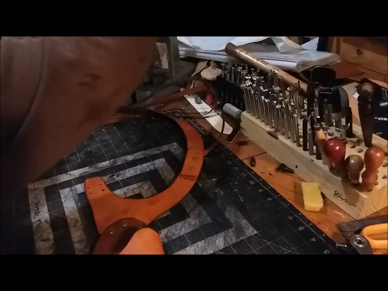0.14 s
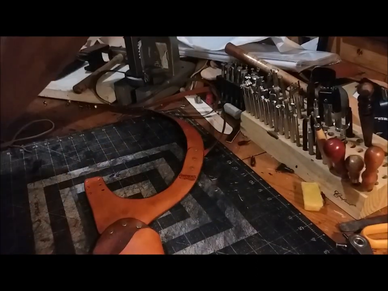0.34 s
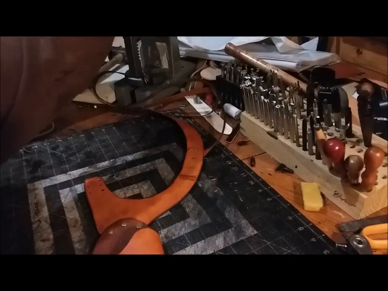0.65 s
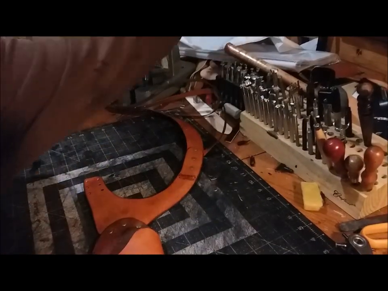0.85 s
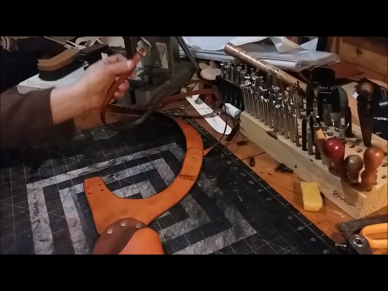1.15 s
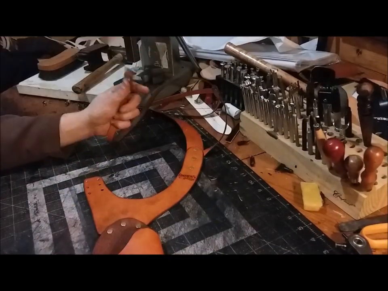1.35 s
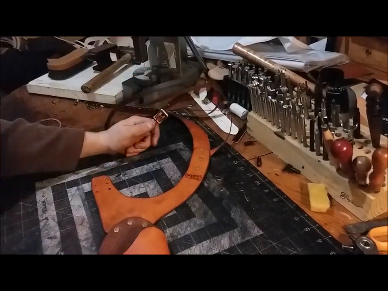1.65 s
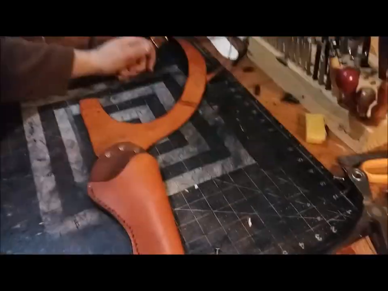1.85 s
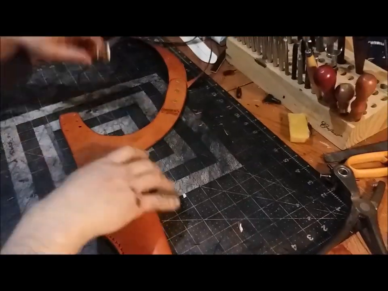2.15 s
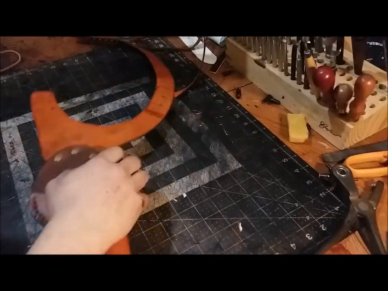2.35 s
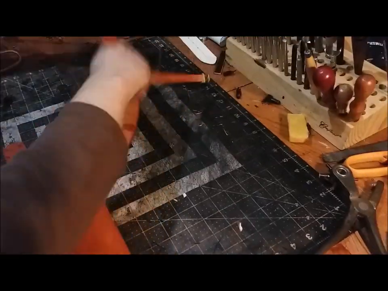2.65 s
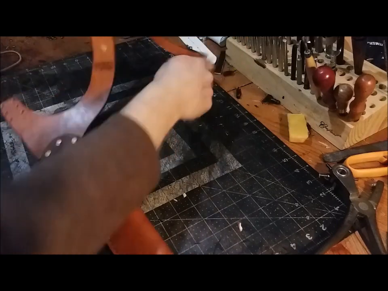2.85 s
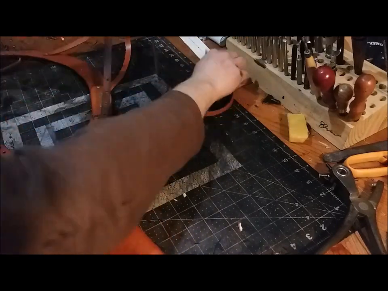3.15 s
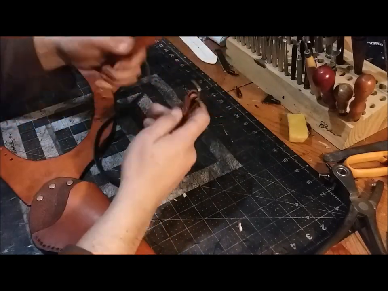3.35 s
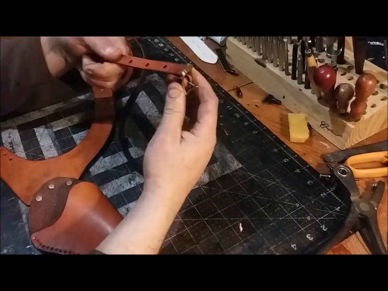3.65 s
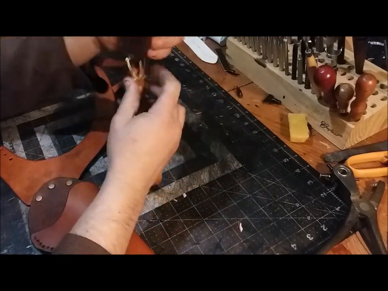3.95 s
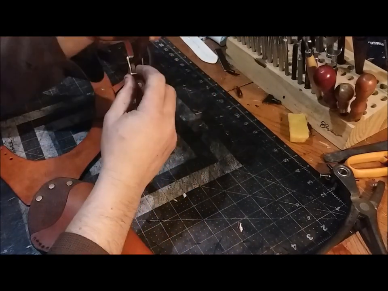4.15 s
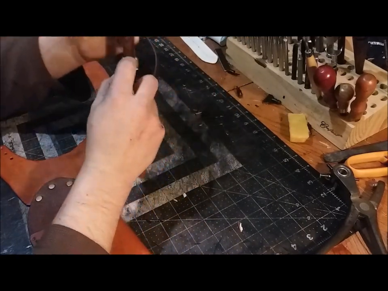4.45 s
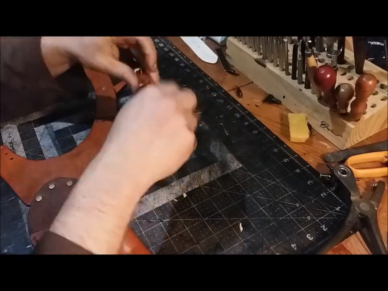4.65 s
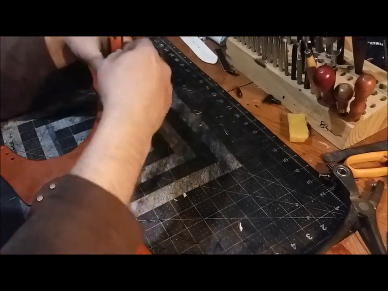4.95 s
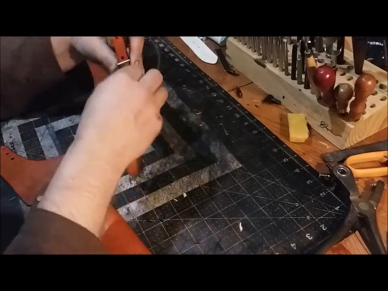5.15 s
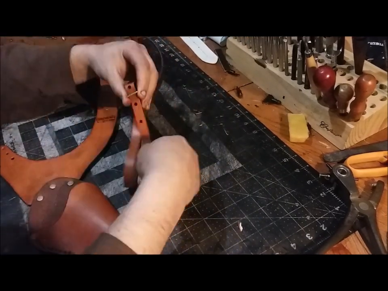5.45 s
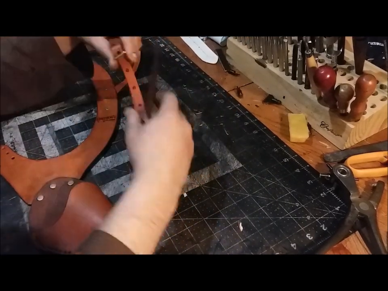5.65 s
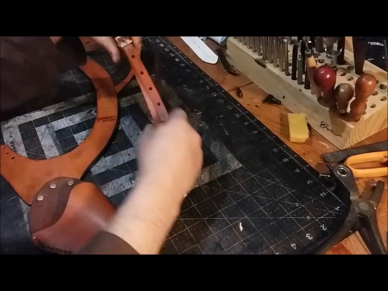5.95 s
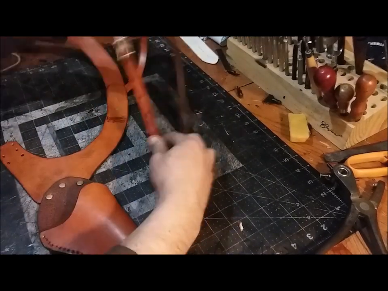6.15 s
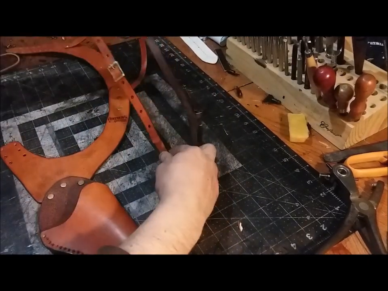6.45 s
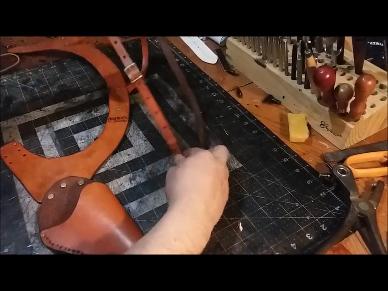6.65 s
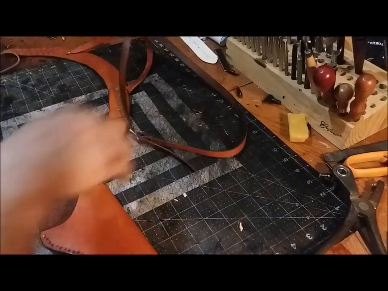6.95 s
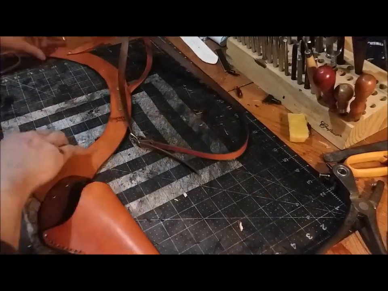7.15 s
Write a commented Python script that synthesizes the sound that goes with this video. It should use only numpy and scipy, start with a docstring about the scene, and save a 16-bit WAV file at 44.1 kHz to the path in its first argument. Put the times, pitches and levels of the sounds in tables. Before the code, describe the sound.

Leather straps rasp, slap and slide on a workbench while a small metal buckle clicks and clinks over a faint hum.

```python
"""A cluttered workbench, up close: leather straps with a small metal buckle are handled.
A strap is dragged out with a dry rasp, slaps down, slides over the cutting mat and is pulled through
the buckle, which clicks and drops. Tiny friction slips ring leather and bench; the buckle's tongue
and frame ring in damped modes. Hands bump the bench; the shop answers briefly, over a faint hum."""
import sys
import numpy as np
from scipy import signal
from scipy.fft import rfft, irfft, next_fast_len
from scipy.io import wavfile
from scipy.ndimage import uniform_filter1d, map_coordinates

SR = 44100
rng = np.random.default_rng(int(sys.argv[2]) if len(sys.argv) > 2 else 0)


def persist_wave(psi):
    """Save psi, clipped to +-1, as 16-bit WAV."""
    counts = np.round(np.clip(psi, -1, 1) * 32767).astype(np.int16)
    wavfile.write(sys.argv[1], SR, np.atleast_2d(counts).T)


N = 321930

# Event levels are relative within each table.
# hum partials: pitch_hz, rms_db
HUM_PARTIALS = [(236.9, -73), (414.5, -89.5), (516.8, -90.5), (1066, -83)]
# stereo width: freq_hz, side_to_mid_db
STEREO_WIDTH = [(60, -2.5), (160, -7), (260, -7.5), (450, -7.5), (800, -10), (1500, -5.5), (4000, 1)]
# hand and leather on the bench: start_s, level_db, pitch_hz
BUMPS = [(0.606, -45.5, 344), (0.789, -29.5, 530), (1.17, -38, 429), (1.331, -40, 326), (1.335, -32, 426),
         (1.431, -54, 430), (2.027, -45, 322), (4.879, -43, 402), (5.316, -54.5, 410), (5.488, -54.5, 385),
         (5.563, -50, 387), (5.595, -48, 394), (5.609, -47.5, 305), (5.812, -50, 396), (5.854, -52, 353),
         (6.141, -51, 385), (7.181, -44, 442)]
# buckle tongue ticks: start_s, level_db, pan_db
TONGUE_TICKS = [(1.7774, -28, 12), (1.801, -20.5, 25), (2.4476, -1, -1.5), (3.1, -38, 6), (3.265, -48, 0)]
# buckle frame struck or grazed: centre_s, level_db, graze_s, tilt_db_per_oct
FRAME_CLINKS = [(1.505, -53, .006, 5), (3.563, -46, .003, 1), (3.829, -46.5, .004, 2),
                (4.142, -58.5, .004, 2), (4.396, -53, 0.0049, 1), (4.697, -58, .006, -1),
                (4.748, -53.5, .005, 2), (4.796, -51, .005, 3), (5.668, -31.5, 0.0038, 4.5),
                (5.757, -50, .004, -1), (5.786, -41, 0.0024, 2), (5.897, -43, .006, -1),
                (5.946, -39, .005, 0), (5.983, -32.5, .005, -3.5), (6.047, -48, .005, -2),
                (6.181, -49, .006, -3), (6.2, -30.5, 0.0028, 0), (6.2065, -24.5, .002, -4),
                (6.289, -37.5, .005, 2), (6.594, -32.5, 0.0045, -1.5), (6.653, -45, .005, 0),
                (6.753, -29, 0.0036, -1), (6.812, -46, 0.0053, -3), (6.9301, -17.5, .0003, 1),
                (6.936, -17.5, .0004, 0.5), (7.013, -46.5, .007, -3)]
# buckle modes: pitch_hz, level_db, t60_s
TONGUE_MODES = [(4850, -7, 0.0065), (8440, -23.5, .022), (9300, -24, .024), (12900, -24, .026),
                (15250, -24, .026)]
FRAME_MODES = [(3800, -15, .06), (4510, -12, .07), (4830, 3, .011), (5016, -13, .06), (5850, -7, .018),
               (7120, -16, .035), (8770, -8, 0.013)]
# leather slaps, flicks, finger taps: start_s, crack_db, clap_db, thud_db, pan_db
SLAPS = [(0.134, -52, -48, -47.5, 4), (0.3696, -42.5, -79, -65, -1), (0.773, -30, -50, -52, -2),
         (0.7862, -17.5, -41.5, -46, -0.5), (1.1443, -36, -36.5, -71, 1), (1.7814, -56, -45.5, -48, 2),
         (1.7978, -55, -44, -45.5, 2), (2.0054, -47.5, -57.5, -49, 8), (2.4479, -2, -28, -46, 2.5),
         (2.4949, -19.5, -41.5, -52.5, -1), (2.5018, -25, -41.5, -55, 1), (2.8256, -43, -44.5, -49.5, 1),
         (2.8753, -21.5, -44.5, -47.5, 1), (2.9126, -27, -43, -48, 3), (2.9382, -21, -51, -68, 1),
         (2.9482, -25, -62, -66, -2), (2.973, -19.5, -53, -55, -5), (3.02, -24.5, -45.5, -54, 4),
         (3.143, -28.5, -40, -57, 0.5), (3.1632, -26, -64, -60, -0.5), (3.3167, -26, -52, -55.5, 1.5),
         (3.3214, -20.5, -53, -52, -2), (3.5796, -29.5, -40, -43, 0), (3.689, -38, -54, -50, -0.5),
         (3.893, -33.5, -50, -47, -1), (4.8432, -23.5, -43.5, -42, -2.5), (4.8607, -33, -46.5, -47.5, -1),
         (5.343, -56, -50.5, -57, -1), (5.4144, -42, -53.5, -51, -1), (5.4537, -51.5, -56, -55, -1),
         (6.4356, -21, -42, -39, -1), (6.591, -45, -59, -74, 1), (6.936, -20, -34.5, -39, 0.5),
         (6.9666, -22.5, -44, -48.5, -1), (6.9764, -40, -64.5, -50, 5), (7.1893, -52, -54.5, -51, 4)]
# strap catching: centre_s, length_s, level_db, pitch_hz, half_width_oct
SCRAPES = [(0.044, 0.0038, -42.5, 2970, 0.24), (0.065, 0.0037, -40.5, 3000, 0.23),
           (0.147, 0.018, -38.5, 2580, 0.35), (0.376, .011, -55.5, 3040, 0.22),
           (0.783, .012, -38, 2620, 0.39), (0.877, 0.032, -38.5, 1840, .32), (1.008, 0.017, -36, 1850, .26),
           (1.031, 0.042, -46, 2000, 0.28), (1.154, .015, -41, 1750, 0.28),
           (1.7987, 0.0032, -36.5, 1660, 0.23), (2.453, 0.0092, -26, 12500, 0.35),
           (2.456, .01, -25.5, 2400, .17), (2.503, .002, -32, 3700, .25), (2.513, .002, -37, 3300, 0.37),
           (2.838, 0.022, -38, 10400, 0.22), (2.892, 0.021, -48, 5900, .12),
           (2.917, 0.0096, -37.5, 3670, 0.18), (2.985, .015, -35, 7150, .25), (3.33, .012, -40, 7180, 0.23),
           (5.948, 0.021, -53.5, 1045, 0.27)]
# friction strokes: start_s, rise_s, hold_s, rasp_db, drone_db, fizz_db
DRAG_STROKES = [(0, 0.0015, 0.018, -47.5, -47.5, -63), (.036, 0.0043, 0.039, -48.5, -50, -67.5),
                (.134, 0.005, 0.0055, -35, -41, -38.5), (.25, 0.014, 0.57, -81, -70, -82),
                (.574, 0.0064, 0.058, -56, -50.5, -57), (.683, 0.0086, 0.059, -68, -51, -80),
                (.771, 0.01, 0.019, -36.5, -38, -38.5), (.81, 0.054, 0.021, -34.5, -43.5, -37),
                (.895, 0.0098, 0.036, -47.5, -54, -65), (.978, 0.035, .012, -45, -58, -40.5),
                (1.02, 0.013, 0.0095, -47, -63, -49.5), (1.05, 0.012, 0.046, -58, -59.5, -85),
                (1.13, 0.029, 0.014, -40.5, -47.5, -41), (1.22, 0.04, 0.013, -63, -57, -58.5)]  # dragged out
SLIDE_STROKES = [(1.715, 0.0054, 0.041, -55.5, -64, -64.5), (2.069, 0.011, 0.0065, -60, -65, -46.5),
                 (2.095, 0.013, 0.0069, -58.5, -58.5, -52.5), (2.165, 0.022, 0.02, -63, -72, -67.5),
                 (2.28, 0.0085, 0.26, -70.5, -68, -64), (2.54, 0.0072, .004, -54, -60.5, -52),
                 (2.565, 0.013, 0.012, -56.5, -66, -52), (2.595, 0.048, 0.051, -50.5, -61.5, -48),
                 (2.69, 0.024, 0.059, -56, -62, -51), (2.818, 0.017, .03, -50, -54, -39),
                 (2.908, .008, 0.066, -46.5, -55, -44), (2.965, 0.019, 0.018, -36, -57.5, -29.5),
                 (3.015, 0.014, .012, -45, -66, -42), (3.07, 0.038, 0.036, -69, -63, -73),
                 (3.145, .02, 0.0066, -47, -68, -51), (3.23, 0.01, 0.043, -68, -70.5, -64),
                 (3.306, 0.023, 0.014, -38, -60, -34), (3.473, 0.0056, 0.028, -59.5, -69, -58.5),
                 (4.37, 0.024, 0.015, -73.5, -76, -78)]  # over leather and mat
PULL_STROKES = [(5.4, 0.072, 0.058, -71.5, -63, -71), (5.654, 0.014, 0.002, -58.5, -62.5, -52),
                (5.878, .012, 0.016, -59, -54.5, -52.5), (5.915, 0.022, 0.014, -54.5, -63, -49.5),
                (5.972, 0.017, 0.011, -57, -58.5, -55), (6.035, 0.01, 0.02, -63.5, -60.5, -60),
                (6.155, 0.023, 0.017, -74, -72, -61.5), (6.19, 0.02, 0.0038, -61, -64.5, -49),
                (6.23, 0.031, 0.0091, -69, -69, -69), (6.272, 0.0091, 0.0094, -58.5, -64, -46.5),
                (6.583, 0.016, 0.0085, -51.5, -57, -47.5), (6.63, 0.017, 0.0035, -60.5, -77, -53),
                (6.703, 0.019, 0.035, -61.5, -72, -50.5), (6.795, 0.016, 0.0045, -58.5, -76, -57.5),
                (7.035, 0.018, 0.011, -62.5, -77.5, -60), (7.178, 0.022, 0.026, -62.5, -55.5, -72),
                (7.225, 0.028, 0.028, -55.5, -67, -49), (7.285, 0.0074, .01, -56, -79, -40.5)]  # through the buckle, then laid down
# decay after a stroke, rows rasp / bench drone / fizz: release_ratio, trail_offset_db
BAND_DECAYS = [(1.06, 1.5), (1.3, 7.5), (0.7, -6)]
# dragged strap resonances: centre_hz, width_hz, gain_db
STRAP_RESONANCES = [(454, 37, 0.5), (1560, 180, 3), (2170, 1100, 6), (6460, 570, 1), (10200, 700, 4.5),
                    (11750, 310, 7)]
# source spectra: freq_hz, gain_db
AIR_TONE = [(25, -17), (140, -18.5), (200, -13), (300, -1.5), (520, -1.5), (800, -9), (1100, -7),
            (1600, -16.5), (2600, -14.5), (4000, -20), (8000, -22.5), (15500, -27.5)]
SKIN_TONE = [(60, -34), (160, -30), (300, -8), (800, 2), (1500, -5), (4000, -15), (12000, -34)]
TONGUE_TONE = [(400, -50), (2000, -19), (3700, -14), (4500, -1.5), (9000, 1.5), (11500, -4), (16000, -5)]
FRAME_TONE = [(400, -41), (2000, -16.5), (3200, -8.5), (4200, 0), (6000, -1), (9000, -1.5), (12000, -9),
              (16000, -15)]
CRACK_TONE = [(400, -57), (1800, -17.5), (3000, 1), (5000, -1), (7500, -0.5), (11000, -6), (16000, -17)]
CLAP_TONE = [(150, -44.5), (450, -17), (750, -5.5), (1100, 0.5), (1300, -3.5), (1550, 0), (1850, -4.5),
             (2350, -5.5), (2900, -8.5), (4500, -33)]
THUD_TONE = [(60, -38.5), (190, -35), (270, -8.5), (400, 2), (500, -5), (700, -13), (1400, -35.5)]
DRAG_TONE = [(110, -44), (180, -37.5), (248, -14.5), (374, -12), (435, -3.5), (779, -20.5), (905, -3.5),
             (1420, -6.5), (1560, -3), (4810, -11), (5490, -17), (6750, -10), (9460, -21.5), (10400, -18),
             (12100, -21), (13000, -27), (16000, -25.5)]
SLIDE_TONE = [(110, -38.5), (180, -32.5), (213, -14.5), (404, -9), (658, -11.5), (1090, -0.5), (1370, -4.5),
              (2110, -1), (2740, -2.5), (3700, 1.5), (5800, -1), (10400, -2), (16000, -13.5)]
PULL_TONE = [(110, -66), (180, -53), (209, -18), (230, -3), (419, -2), (622, -8), (1090, -7), (1220, -11),
             (1710, -10), (2030, -11), (3180, -9), (4550, -2.5), (6750, -10.5), (14300, -16), (16000, -24)]


def amp(db):
    """Decibels to gain."""
    return 10 ** (np.asarray(db) / 20)


def unit_rms(x):
    """Scale to rms 1."""
    return x / np.sqrt(np.mean(x ** 2) + 1e-20)


def curve_gain(curve, hz):
    """Gain of a (freq_hz, gain_db) curve, log frequency axis."""
    freq_hz, gain_db = np.transpose(curve)
    return amp(np.interp(np.log(hz + 1), np.log(freq_hz), gain_db))


def seconds(length_s):
    """Time axis."""
    return np.arange(int(length_s * SR)) / SR


def wobble(rate_hz):
    """Smooth random curve, N samples."""
    knots = rng.standard_normal(int(N * rate_hz / SR) + 4)
    return map_coordinates(knots, [np.arange(N) * rate_hz / SR])


def filtered(x, response):
    """Zero-phase filter; response maps Hz to gain."""
    size = next_fast_len(x.shape[-1] + 8192)
    return irfft(rfft(x, size) * response(np.fft.rfftfreq(size, 1 / SR)), size)[..., :x.shape[-1]]


def coloured(x, tone, size=2048):
    """Minimum-phase filter: no sound ahead of the blow."""
    cepstrum = irfft(np.log(curve_gain(tone, np.fft.rfftfreq(size, 1 / SR))))
    cepstrum[1:size // 2] *= 2
    cepstrum[size // 2 + 1:] = 0
    impulse = irfft(np.exp(rfft(cepstrum)))
    return signal.fftconvolve(x, impulse[None], axes=1)[:, :x.shape[1]]


def varied(tone, spread_db):
    """Random offset on each point of a spectrum."""
    return [(hz, db + rng.normal(0, spread_db)) for hz, db in tone]


def tilted(tone, db_per_oct):
    """Spectrum tilted about 1 kHz."""
    return [(hz, db + db_per_oct * np.log2(hz / 1000)) for hz, db in tone]


def at_level(sound, db):
    """Scale a stereo blow to the energy of 10 ms at this level."""
    return amp(db) * sound / np.sqrt(np.sum(sound ** 2) / (2 * .01 * SR))


def add(track, start_s, sound, pan_db=0):
    """Mix in a stereo sound; positive pan is left."""
    start = round(start_s * SR)
    sound, start = sound[:, max(-start, 0):], max(start, 0)
    panned = sound * amp([[pan_db / 2], [-pan_db / 2]])
    track[:, start:start + sound.shape[1]] += panned[:, :N - start]


def stereo_noise(samples):
    """Noise pair: alike in the low mids, unrelated in the treble."""
    mid, side = rng.standard_normal((2, samples))
    side = filtered(side, lambda hz: curve_gain(STEREO_WIDTH, hz))
    return np.array([mid + side, mid - side])


def bench_response(wet_db, t60_s, tail_db=-32, tail_t60_s=.42, onset_s=.0006):
    """Direct spike, dense near reflections, faint room tail."""
    t = seconds(.25)
    decay = amp(-60 * t / t60_s) + amp(tail_db - 60 * t / tail_t60_s)
    echo = stereo_noise(len(t)) * decay * (1 - np.exp(-t / onset_s))
    echo *= amp(wet_db) / np.linalg.norm(echo[0])
    echo[:, 0] += 1
    return echo


def shop():
    """Quiet room air and a slightly unsteady hum."""
    air = unit_rms(filtered(stereo_noise(N), lambda hz: curve_gain(AIR_TONE, hz)))
    t, hum = np.arange(N) / SR, np.zeros(N)
    for hz, rms_db in HUM_PARTIALS:
        peak = np.sqrt(2) * amp(rms_db + 1.7 * wobble(7.4))
        hum += peak * np.sin(2 * np.pi * hz * t + hz / 1500 * wobble(12))
    return amp(-71 + .39 * wobble(1.4)) * air + hum


def bench_bumps(t60_s=.027, rise_s=.0047):
    """Soft touches: a few low cycles and a dull pat of skin."""
    out, t = np.zeros((2, N)), seconds(.1)
    for start_s, db, hz in BUMPS:
        push = np.sin(2 * np.pi * hz * t) * amp(-60 * t / t60_s) * (1 - np.exp(-t / rise_s)) ** 2
        bump = signal.fftconvolve(push[None], bench_response(wet_db=-5, t60_s=.059), axes=1)
        pat = coloured(bench_response(wet_db=7, t60_s=.11), SKIN_TONE)
        add(out, start_s, at_level(bump, db - 8))
        add(out, start_s, at_level(pat, db - 18))
    return out


def damped_sine(t, hz, db, t60_s):
    """One ringing mode."""
    return amp(db - 60 * t / t60_s) * np.sin(2 * np.pi * hz * t)


def buckle_tongue(burst_t60_s=.0028):
    """Dry ticks: a noise burst and the thin tongue's brief ring."""
    out, t = np.zeros((2, N)), seconds(.15)
    for start_s, db, pan_db in TONGUE_TICKS:
        burst = rng.standard_normal(len(t)) * amp(-60 * t / burst_t60_s)
        ring = sum(damped_sine(t, *mode) for mode in TONGUE_MODES)
        bench = bench_response(wet_db=-3, t60_s=.0093, tail_db=-45.5)
        tick = signal.fftconvolve((burst + ring)[None], bench, axes=1)
        add(out, start_s, at_level(coloured(tick, TONGUE_TONE), db - 21), pan_db)
    return out


def buckle_frame(mode_spread_db=2.5, pitch_spread=.02, lead_s=.05):
    """Tiny impacts ring the leather-damped frame; fingers and strap load it differently each time."""
    out, t = np.zeros((2, N)), seconds(.15)
    for centre_s, db, graze_s, tilt_db_per_oct in FRAME_CLINKS:
        detune = rng.normal(1, pitch_spread)
        ring = sum(damped_sine(t, hz * detune, rng.normal(mode_db, mode_spread_db), t60_s)
                   for hz, mode_db, t60_s in FRAME_MODES)
        ring[0] += amp(24 - .15 * (db + 30))  # bare click, dominant in light touches
        impacts = rng.standard_normal(len(t)) * np.exp(-np.abs(t - lead_s) / graze_s)
        clink = signal.fftconvolve(ring, impacts)
        clink = signal.fftconvolve(clink[None], bench_response(wet_db=-1, t60_s=.046), axes=1)
        clink = coloured(clink, tilted(FRAME_TONE, tilt_db_per_oct))
        add(out, centre_s - lead_s, at_level(clink, db - 13))
    return out


def leather_slaps():
    """Crack, clap of the leather's face, thud of the bench; harder cracks are brighter."""
    out = np.zeros((2, N))
    for start_s, crack_db, clap_db, thud_db, pan_db in SLAPS:
        crack_tone = tilted(CRACK_TONE, db_per_oct=.17 * max(crack_db + 27, 0))
        crack = coloured(bench_response(wet_db=13.5, t60_s=.076), varied(crack_tone, spread_db=2))
        clap = coloured(bench_response(wet_db=15, t60_s=.08, onset_s=.002), CLAP_TONE)
        thud = coloured(bench_response(wet_db=7.5, t60_s=.083), THUD_TONE)
        add(out, start_s, at_level(crack, crack_db - 15.5) + at_level(clap, clap_db - 3), pan_db)
        add(out, start_s, at_level(thud, thud_db - 2))
    return out


def strap_scrapes():
    """The strap catches and chatters around one pitch, swelling and fading."""
    out, t = np.zeros((2, N)), seconds(.2) - .1
    for centre_s, length_s, db, pitch_hz, half_width_oct in SCRAPES:
        band = lambda hz: 1 / (1 + (np.log2((hz + 1) / pitch_hz) / half_width_oct) ** 2)
        chatter = filtered(stereo_noise(len(t)), band)
        swell = np.exp(-2 * (t / length_s) ** 2)
        add(out, centre_s + t[0], amp(db) * unit_rms(chatter * swell) * np.sqrt(np.mean(swell ** 2)))
    return out


def slips(rate_hz, spread_db, clump_db):
    """Stick-slip impulses of uneven size, in clumps; power levelled over 25 ms."""
    size_db = spread_db * np.clip(rng.standard_normal(N), -2, 2)
    size_db += clump_db * np.clip(wobble(140), -2, 2)
    grains = (rng.random(N) < rate_hz / SR) * rng.choice([-1, 1], N) * amp(size_db)
    return grains / np.sqrt(np.abs(uniform_filter1d(grains ** 2, size=1100)) + 1e-6)


def moving_contact(grains, wet_db, drift_db=2, drift_hz=22):
    """The rubbing spot wanders: two reflection paths crossfade and the spectrum drifts."""
    angle, rub = wobble(5), np.zeros((2, N))
    for share in (np.cos(angle), np.sin(angle)):
        rub += signal.oaconvolve((grains * share)[None], bench_response(wet_db, .11), axes=1)[:, :N]
    hz, t, spectra = signal.stft(rub, SR, nperseg=256)
    grid = np.meshgrid(2.5 * np.log2(1 + hz / 500), t * drift_hz, indexing="ij")
    drift = map_coordinates(rng.standard_normal((32, 256)), grid, mode="mirror")
    return signal.istft(spectra * amp(drift_db * drift), SR, nperseg=256)[1][:, :N]


def stroke_envelope(strokes, band, release_t60_s, trail_db, sag_db=3, trail_t60_s=.6):
    """Each stroke swells, sags while held and stops quickly; slack leather trails on faintly."""
    t, power = np.arange(N) / SR, np.zeros(N)
    for start_s, rise_s, hold_s, *levels_db in strokes:
        active = (t >= start_s) & (t < start_s + .7)
        age_s = t[active] - start_s
        swell = np.clip(age_s / rise_s, 0, 1) ** .95
        sag = amp(-sag_db * np.clip((age_s - rise_s) / hold_s, 0, 1))
        after_s = np.maximum(age_s - rise_s - hold_s, 0)
        release = amp(-60 * after_s / release_t60_s) + amp(trail_db - 60 * after_s / trail_t60_s)
        power[active] += (amp(levels_db[band]) * swell * sag * release) ** 2
    return np.sqrt(power)


def friction(strokes, tone, grains, wet_db, base_t60_s, trail_db, peaks=(), drone_hz=820, fizz_hz=3700):
    """Slips ring leather and bench in three bands; the drone lingers, the fizz dies first."""
    def colour(hz):
        peaks_db = sum(db / (1 + (2 * (hz - centre) / width) ** 2) for centre, width, db in peaks)
        return curve_gain(tone, hz) * amp(peaks_db)

    lowpass = lambda hz, edge_hz: 1 / (1 + (hz / edge_hz) ** 10)
    rasp = lambda hz: lowpass(hz, fizz_hz) - lowpass(hz, drone_hz)
    drone = lambda hz: lowpass(hz, drone_hz)
    fizz = lambda hz: 1 - lowpass(hz, fizz_hz)
    rub, out = moving_contact(grains, wet_db), np.zeros((2, N))
    for band, response in enumerate((rasp, drone, fizz)):
        release_ratio, offset_db = BAND_DECAYS[band]
        envelope = stroke_envelope(strokes, band, base_t60_s * release_ratio, trail_db + offset_db)
        out += envelope * unit_rms(filtered(rub, lambda hz: colour(hz) * response(hz)))
    return out


def straps():
    """Leather rasps when dragged, hisses over the mat and rubs on the buckle's bar."""
    drag = friction(DRAG_STROKES, DRAG_TONE, slips(rate_hz=2000, spread_db=3.5, clump_db=3),
                    wet_db=4.5, base_t60_s=.094, trail_db=-30, peaks=STRAP_RESONANCES)
    slide = friction(SLIDE_STROKES, SLIDE_TONE, slips(rate_hz=1300, spread_db=8.5, clump_db=0),
                     wet_db=6, base_t60_s=.11, trail_db=-25.5)
    pull = friction(PULL_STROKES, PULL_TONE, slips(rate_hz=1800, spread_db=1.5, clump_db=4),
                    wet_db=3.5, base_t60_s=.091, trail_db=-18)
    return amp(-1.5) * drag + amp(-1) * slide + amp(-2) * pull


def scene():
    """Leather, bench, buckle and shop, in stereo."""
    leather = straps() + strap_scrapes() + leather_slaps()
    return leather + bench_bumps() + buckle_tongue() + buckle_frame() + shop()


def record(dry):
    """Steep low-pass at 16.1 kHz."""
    return filtered(dry, lambda hz: 1 / (1 + (hz / 16100) ** 120))


dry = scene()
out = record(dry)
persist_wave(out)
```